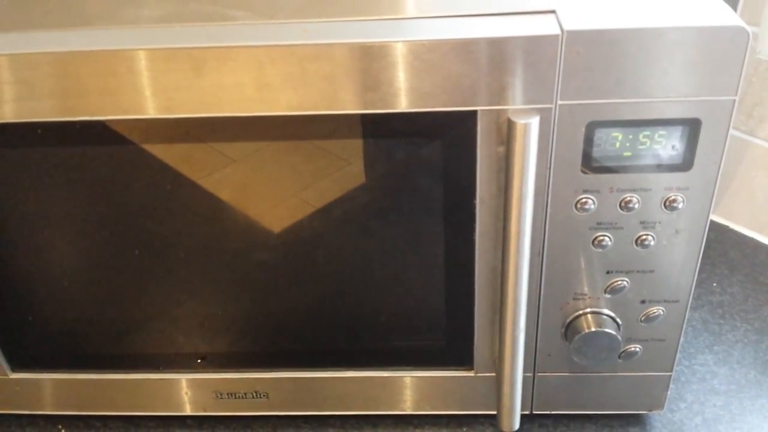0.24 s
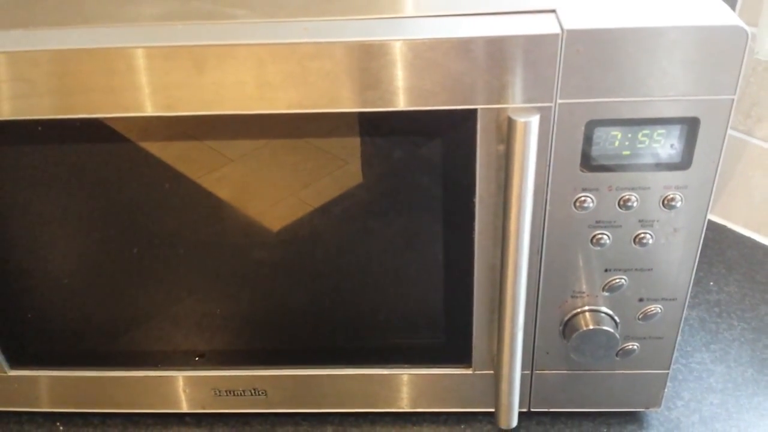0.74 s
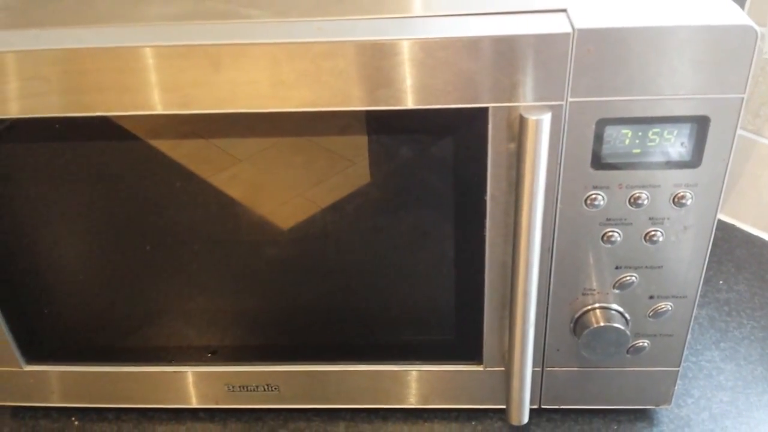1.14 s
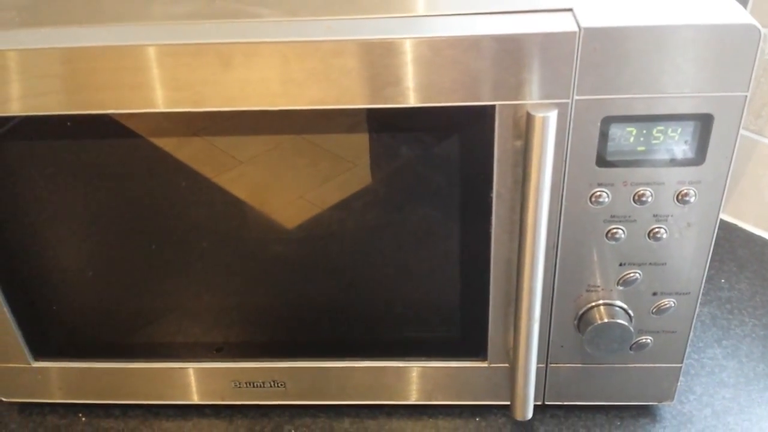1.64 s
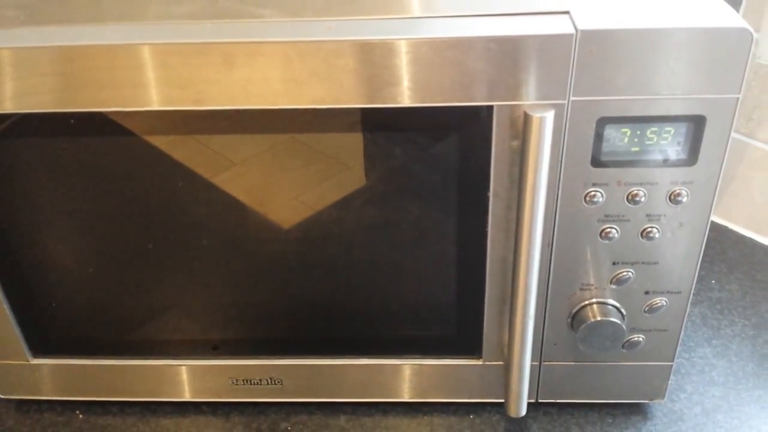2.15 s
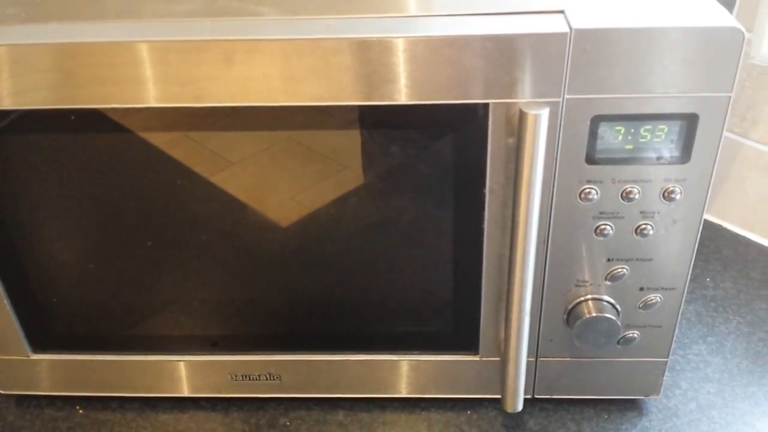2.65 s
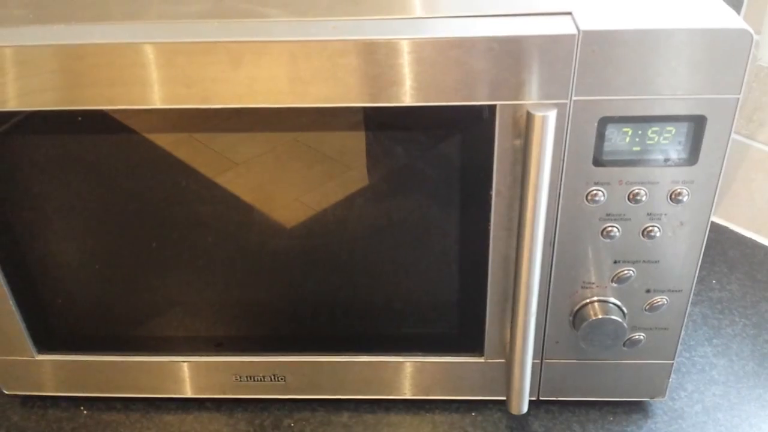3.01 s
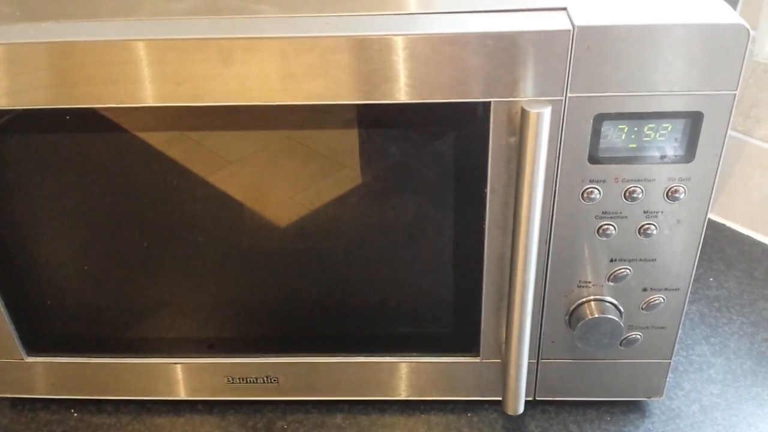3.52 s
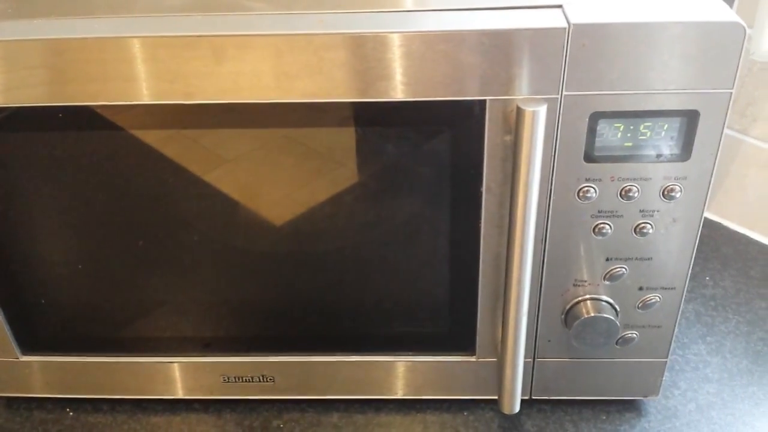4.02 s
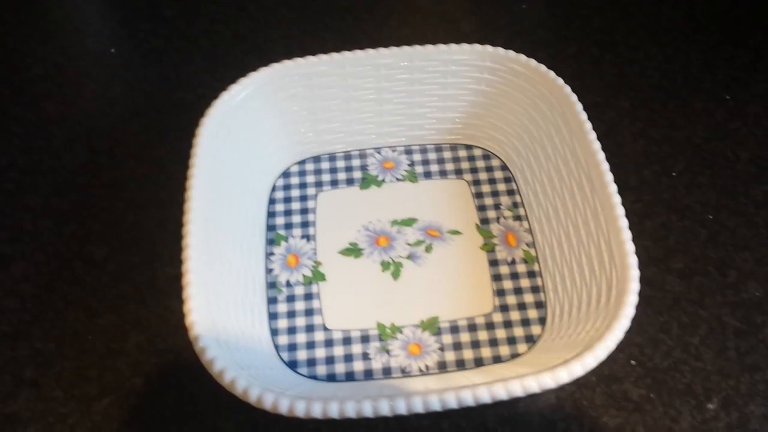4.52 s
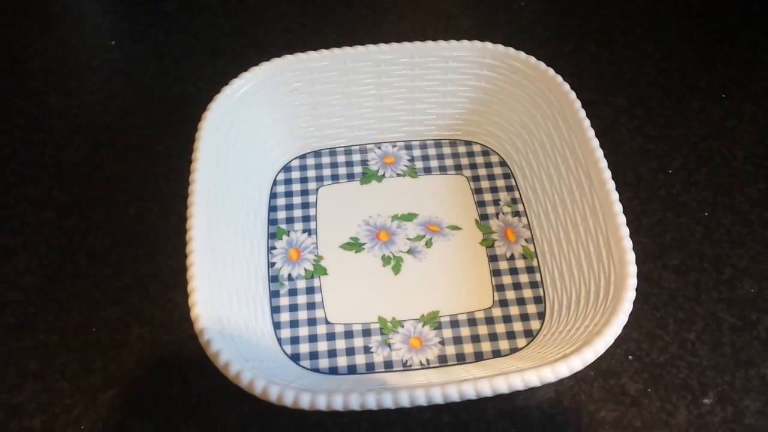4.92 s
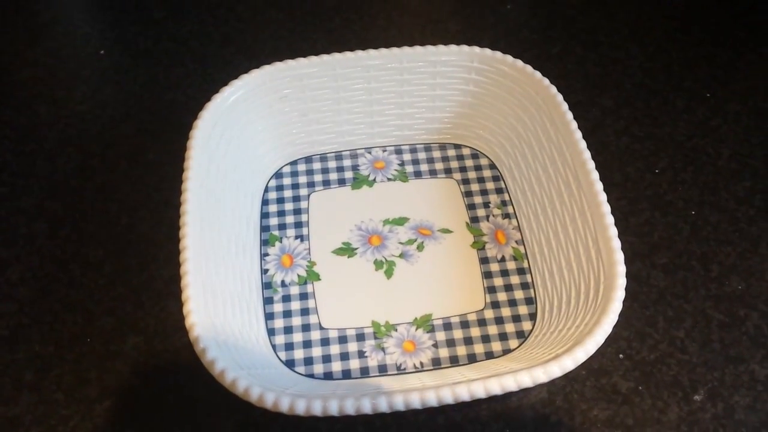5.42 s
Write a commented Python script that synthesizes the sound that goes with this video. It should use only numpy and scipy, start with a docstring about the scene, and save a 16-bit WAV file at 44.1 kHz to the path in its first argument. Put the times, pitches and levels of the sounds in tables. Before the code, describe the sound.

Steady low microwave drone with airy fan noise in a kitchen; a sharp tick, a sudden shift in perspective, then a small bouncing clink.

```python
"""Microwave oven in a kitchen

The oven's transformer hums and buzzes on the 50 Hz mains: summed lines and a pattern repeated each cycle.
Its fan blows through the case: wavering tones and filtered noise.
It is heard in front of the door, then, after an abrupt change of place, over the worktop with a chatter.
A dry tick (a short rising burst) sounds close by on the left; later noisy contacts
ring high modes in a light clink on the right."""
import sys
import numpy as np
from scipy import signal
from scipy.fft import rfft, irfft, next_fast_len
from scipy.io import wavfile

SR = 44100
rng = np.random.default_rng(int(sys.argv[2]) if len(sys.argv) > 2 else 0)


def bounce(signal):
    """Save signal as a 16-bit WAV file at the path given by the first command-line argument."""
    frames = np.transpose(np.atleast_2d(signal))
    limited = np.clip(frames, -1, 1)
    pcm = np.round(limited * 32767).astype(np.int16)
    wavfile.write(sys.argv[1], SR, pcm)


N = 249585
TIME = np.arange(N) / SR
MAINS_HZ = 49.943
EDGE_HZ = 15480  # upper band limit
DOOR, WORKTOP = 0, 1  # listening places
MOVE_S = 4.487  # when the place changes


def amp(db):
    """Decibels to gain."""
    return 10 ** (np.asarray(db) / 20)


def read(table, column, hz):
    """One column after the frequency, joined by straight lines over log frequency."""
    rows = np.transpose(table)
    return np.interp(np.log(hz + 1), np.log(rows[0] + 1), rows[1:][column])


def drift(rate):
    """Slow random wander of unit size, with changes up to about rate a second."""
    size = 2 * N
    rate_hz = np.fft.rfftfreq(size, 1 / SR)
    smoothing = 1 / (1 + (rate_hz / rate) ** 2) ** 2
    slow = irfft(rfft(rng.standard_normal(size)) * smoothing, size)[:N]
    return (slow - slow.mean()) / slow.std()


def pan(lean_db):
    """Left and right gains of mean power 1; a positive lean is to the left."""
    lean_db = np.atleast_1d(lean_db)
    gains = amp(np.array([lean_db, -lean_db]) / 2)
    return gains / np.sqrt(np.mean(gains ** 2, axis=0))


# The two microphone ports:
# (frequency [Hz], left minus right at the door [dB], the same at the worktop [dB], likeness [0-1])
PORTS = [(49.4, 1.5, 0, .99), (100, -5, -0.5, 1), (189, 0, -1.5, 1), (375, -1.8, -1, .95),
         (680, -1, -2, 0.81), (1290, 0, -4, 0.31), (2380, 2, -9, 0.16), (4370, -2, -5, 0.03),
         (8000, -5, -6.5, 0.05), (14000, -4, -4, 0)]


def tone(hz, turns, place):
    """A line of rms 1 over both ports; short waves reach them out of step."""
    start = rng.random()
    likeness = np.clip(read(PORTS, -1, hz), 0, 1)
    skew = rng.choice([-1, 1]) * np.arccos(likeness)
    phase = 2 * np.pi * (turns + start) + np.array([[0], [skew]])
    return np.sqrt(2) * pan(read(PORTS, place, hz)) * np.cos(phase)


# Boom of the case panels heard at the door, before its waver: (time [s], level [dB])
BOOM_DOOR = [(0.04, -18.5), (1.3, -20.5), (1.41, -23.7), (1.47, -20.5), (1.65, -18.5), (4.45, -19)]
# The same boom heard over the worktop: (time [s], level [dB])
BOOM_WORKTOP = [(4.53, -22), (4.68, -21.3), (4.76, -23.5), (5.07, -23.5), (5.16, -21), (5.6, -21)]


def boom(place, turns, order=4, waver_db=0.9, settled_waver_db=0.13, waver_per_s=9.4, settle_s=1.8):
    """The case panels boom on the fourth multiple of the mains, unsteadily at first."""
    level_db = np.interp(TIME, *np.transpose([BOOM_DOOR, BOOM_WORKTOP][place]))
    depth_db = np.interp(TIME, [settle_s / 2, settle_s], [waver_db, settled_waver_db])
    gain = amp(level_db + depth_db * drift(waver_per_s))
    return gain * tone(order * MAINS_HZ, order * turns, place)


# The other hum lines, before flutter:
# (multiple of the mains, level at the door [dB], level at the worktop [dB])
HUM = [(1, -43, -45.5), (2, -30.5, -26), (5, -61.5, -55), (6, -45.5, -55), (7, -44, -46), (8, -38.5, -35),
       (12, -58, -47.5), (14, -56.5, -48), (16, -48, -72), (18, -54, -57.5), (20, -46.5, -58),
       (22, -57, -58), (24, -58, -69), (26, -63.5, -57.5), (30, -55, -69), (34, -60, -56), (36, -54.5, -62),
       (40, -55.5, -68), (42, -56, -73)]


def hum(place, turns, flutter=.02, flutter_per_order=0.0046):
    """The transformer shakes the case at multiples of the mains; higher lines flutter more."""
    out = np.zeros((2, N))
    for order, *level_db in HUM:
        k = round(order)
        unsteady = 1 + (flutter + flutter_per_order * k) * drift(6.3)
        out += amp(level_db[place]) * unsteady * tone(k * MAINS_HZ, k * turns, place)
    return out


# Average spectrum of the sheet metal's buzz:
# (frequency [Hz], level per line at the door [dB], level per line at the worktop [dB])
BUZZ = [(1160, -72, -69), (2080, -70.5, -61.5), (2540, -67, -67), (3470, -71.5, -68.5), (5130, -68, -76),
        (5840, -81.5, -79), (6500, -71.5, -71.5), (7460, -74, -80), (8700, -83, -84), (10300, -79.5, -85),
        (11800, -94, -94)]


def buzz(place, turns, shift=0.28, size=2048, count=3):
    """Loose sheet metal rattles alike in every mains cycle, in a pattern that slowly shifts."""
    hz = np.arange(size // 2 + 1) * MAINS_HZ
    in_band = (hz > BUZZ[0][0]) * (hz < EDGE_HZ)
    lines = amp(read(BUZZ, place, hz)) * pan(read(PORTS, place, hz)) * in_band
    # one steady pattern, the others fading in and out
    weights = [1] + [shift * drift(2.9) for _ in range(count - 1)]
    out = np.zeros((2, N))
    for weight in weights:
        real, imag = rng.standard_normal((2, 2, len(hz)))
        cycles = irfft(lines * (real + 1j * imag)) * size / 2
        out += weight * np.array([np.interp(turns % 1, np.linspace(0, 1, size), cycle) for cycle in cycles])
    return out / np.sqrt(1 + (count - 1) * shift ** 2)


# Tones of the fan and its motor, before waver and flutter:
# (frequency [Hz], level at the door [dB], level at the worktop [dB])
FAN_TONES = [(108.2, -49, -54), (143.6, -42.5, -35.5), (172.3, -45.5, -47), (245.6, -59, -43),
             (294.3, -50, -52), (343.6, -50.5, -51)]


def fan_tones(place, waver=0.0015, flutter=0.22):
    """The fan's speed wavers a little, and its tones with it."""
    clock = np.cumsum(1 + waver * drift(3.9)) / SR
    out = np.zeros((2, N))
    for hz, *level_db in FAN_TONES:
        unsteady = 1 + flutter * drift(2.4)
        out += amp(level_db[place]) * unsteady * tone(hz, hz * clock, place)
    return out


def reflections(hz, strength=0.41, latest_s=.016, above_hz=1500, count=10):
    """Echoes off the worktop and tiles comb the treble, differently at each port."""
    delays = rng.uniform(.001, latest_s, (count, 2, 1))
    echoes = sum(np.exp(-2j * np.pi * hz * delay) for delay in delays) / np.sqrt(count)
    share = strength * hz ** 2 / (hz ** 2 + above_hz ** 2)
    return abs(1 + share * echoes) / np.sqrt(1 + share ** 2)


def hiss_swell(peak_s=2.98, rise_s=0.32, fall_s=.08, lift_db=2.2):
    """Gain of the fan's hiss: it builds up once and drops back quickly."""
    width_s = np.where(TIME < peak_s, rise_s, fall_s)
    return amp(lift_db * np.exp(-((TIME - peak_s) / width_s) ** 2))


# Rush of the fan, before the vents, reflections and swells colour it:
# (frequency [Hz], density at the door [dB per Hz], density at the worktop [dB per Hz])
RUSH = [(25, -79.5, -75), (70, -78, -73), (115, -65, -61.5), (187, -59.5, -55.5), (268, -64.5, -64),
        (464, -73, -68.5), (1110, -75.5, -79.5), (2120, -73.5, -73.5), (2670, -81, -76.5),
        (4360, -82.5, -80), (5740, -85.5, -85.5), (7600, -89.5, -90.5), (10600, -97, -97.5),
        (12400, -101, -102)]
# Air resonances of the case and vents:
# (frequency [Hz], width [Hz], lift at the door [dB], lift at the worktop [dB])
VENTS = [(349.2, 15.7, 13.5, 11.5), (520, 33.4, 9.5, 8.5), (680, 36.5, 8, 12.5), (855, 47, 9, 8),
         (1031, 57, 8.5, 7.5), (1215, 35, 7, 7.5), (1322, 31, 11, 8), (1662, 44, 8, 4), (2385, 41, 4, -2)]


def fan_rush(place, turns, waver_db=0.5, throb=0.19, hiss_hz=4500):
    """Turbulent air coloured by the case wavers in level; its hiss swells and throbs at twice the mains."""
    size = next_fast_len(N)
    hz = np.fft.rfftfreq(size, 1 / SR)
    lift = np.zeros(len(hz))
    for centre, width, *lift_db in VENTS:
        lift += (amp(lift_db[place]) ** 2 - 1) / (1 + ((hz - centre) / width) ** 2) ** 2
    resonance = np.sqrt(np.maximum(1 + lift, .1) * SR / 2)  # SR / 2 turns density into level
    colour = amp(read(RUSH, place, hz)) * resonance * reflections(hz)
    left, other = rfft(rng.standard_normal((2, size)))
    same = np.clip(read(PORTS, -1, hz), 0, 1)  # long waves reach both ports alike
    right = same * left + np.sqrt(1 - same ** 2) * other
    air = colour * pan(read(PORTS, place, hz)) * np.array([left, right])
    high = hz ** 2 / (hz ** 2 + hiss_hz ** 2)
    body = irfft(air * (1 - high))[:, :N]
    hiss = irfft(air * high)[:, :N]
    hiss_gain = hiss_swell() * (1 + throb * np.cos(2 * np.pi * 2 * turns))
    return (body + hiss_gain * hiss) * amp(waver_db * drift(7.2))


def oven(place, mains_waver=.00008):
    """Everything the running oven sends to one listening place, on one slightly wavering mains."""
    turns = np.cumsum(MAINS_HZ * (1 + mains_waver * drift(2.05))) / SR
    return boom(place, turns) + hum(place, turns) + buzz(place, turns) + fan_tones(place) + fan_rush(place, turns)


def tick(at_s=4.4199, hz=3700, length_s=.0003, level_db=-9.5, lean_db=10, spread=0.48, thin_hz=2500):
    """A few thin cycles with no ring, rising in pitch as they pass."""
    u = np.clip((TIME - at_s) / length_s, -10, 10)
    cycles = hz * length_s * (u + spread * u ** 2 / 2)  # hz is the pitch at the centre
    snap = np.exp(-u ** 2) * np.cos(2 * np.pi * cycles)
    thin = signal.sosfilt(signal.butter(6, thin_hz, "high", fs=SR, output="sos"), snap)
    return amp(level_db) * pan(lean_db) * thin


def ring(x, hz, width):
    """A resonance struck by x: each unit blow starts a dying sine of starting height 1."""
    t = np.arange(SR // 10) / SR
    return signal.oaconvolve(x, np.exp(-np.pi * width * t) * np.sin(2 * np.pi * hz * t))[:N]


def chatter(hz=7420, width=330, level_db=-47, lean_db=-7, uneven=.2):
    """Near the worktop a loose part taps once in every mains cycle."""
    new_cycle = np.diff(np.floor(TIME * MAINS_HZ), prepend=0)
    taps = new_cycle * (1 + uneven * rng.standard_normal(N))
    return amp(level_db) * pan(lean_db) * ring(taps, hz, width)


# The clink and its two bounces, relative strengths: (time [s], level [dB])
CLINKS = [(5.1721, -25), (5.1813, -29.5), (5.19, -30)]
# Broad resonances of what clinks: (frequency [Hz], width [Hz], relative level [dB])
CLINK_MODES = [(2300, 310, 1), (3150, 340, 3.5), (3620, 300, 3), (4190, 320, 6.5), (4900, 700, -9),
               (6170, 460, -3), (7500, 460, 7.5), (9150, 600, -8), (10900, 600, -1)]


def clink(lean_db=-6, scuff_s=0.0043, level_db=-3, room_db=-3, room_t60=0.27, softness_hz=7500):
    """A few light, scuffing contacts ring broad high modes; the kitchen answers briefly."""
    grit = rng.standard_normal(N) / np.sqrt(scuff_s * SR / 2)
    grit = signal.lfilter(*signal.butter(2, min(softness_hz, SR / 3), fs=SR), grit)
    contacts = np.zeros(N)
    for start_s, strength_db in CLINKS:
        contacts += amp(strength_db) * (TIME >= start_s) * np.exp(-abs(TIME - start_s) / scuff_s)
    blows = grit * contacts
    direct = np.zeros((1, N))
    for k, (hz, width, db) in enumerate(CLINK_MODES):
        # neighbouring modes move in opposite senses
        direct += (-1) ** k * amp(db) * ring(blows, hz, width)
    t = np.arange(SR // 2) / SR
    room = rng.standard_normal((2, len(t))) * np.exp(-np.log(1000) * t / room_t60)
    wet = signal.fftconvolve(direct, room / np.linalg.norm(room[0]), axes=1)[:, :N]
    return amp(level_db) * pan(lean_db) * (direct + amp(room_db) * wet)


def scene():
    """The oven from the door, then from the worktop, with the two small sounds."""
    # a 12 ms equal-power crossfade makes the abrupt change of place
    moved = np.clip((TIME - MOVE_S) / .012 + .5, 0, 1) * np.pi / 2
    at_door = np.cos(moved) * oven(DOOR)
    at_worktop = np.sin(moved) * (oven(WORKTOP) + chatter())
    return at_door + at_worktop + tick() + clink()


def record(dry):
    """The recorder's band limit: a steep low-pass."""
    low_pass = signal.firwin(511, EDGE_HZ, window=("kaiser", 9), fs=SR)
    return signal.oaconvolve(dry, low_pass[None], "same")


dry = scene()
out = record(dry)
bounce(out)
```